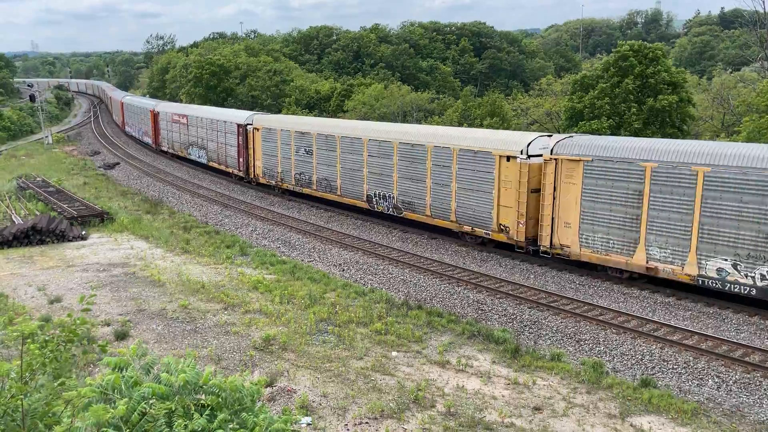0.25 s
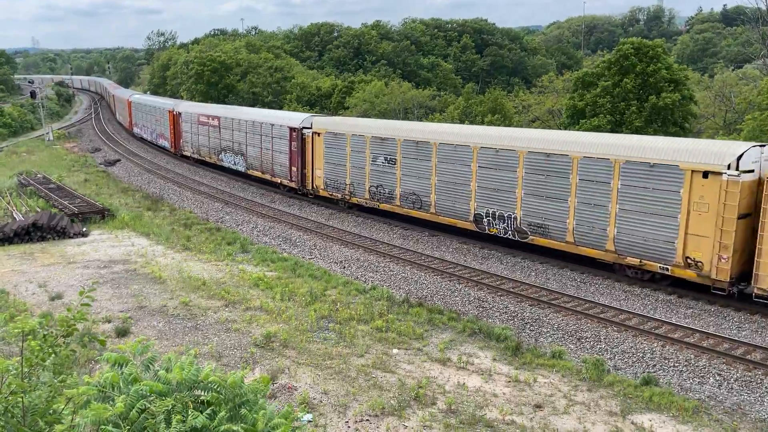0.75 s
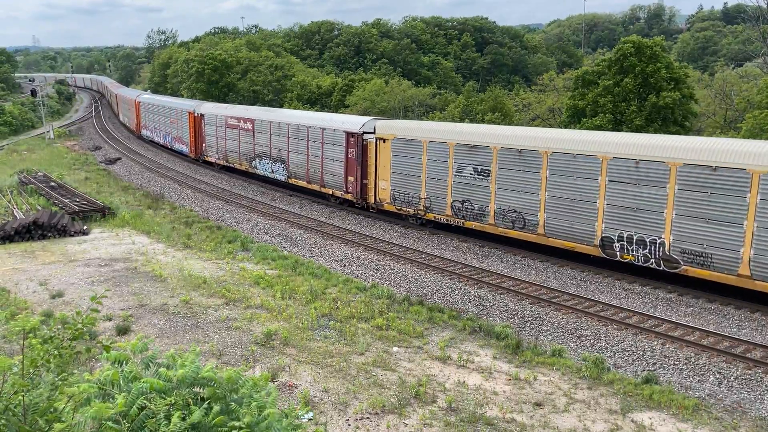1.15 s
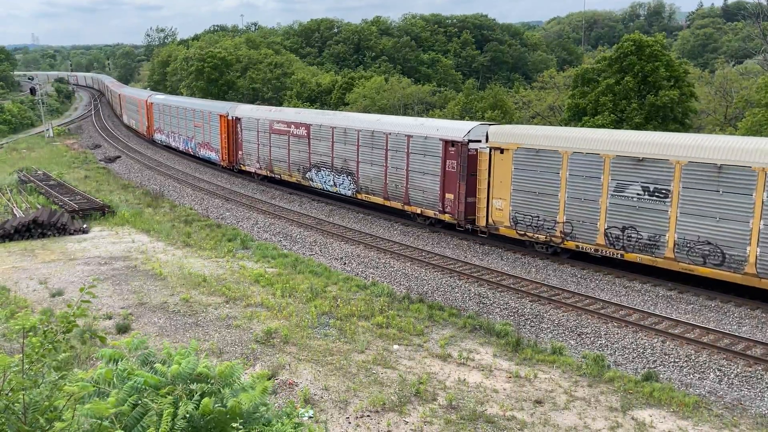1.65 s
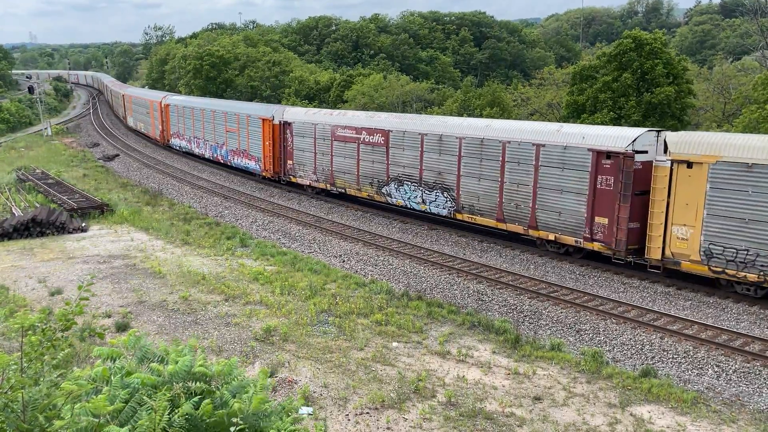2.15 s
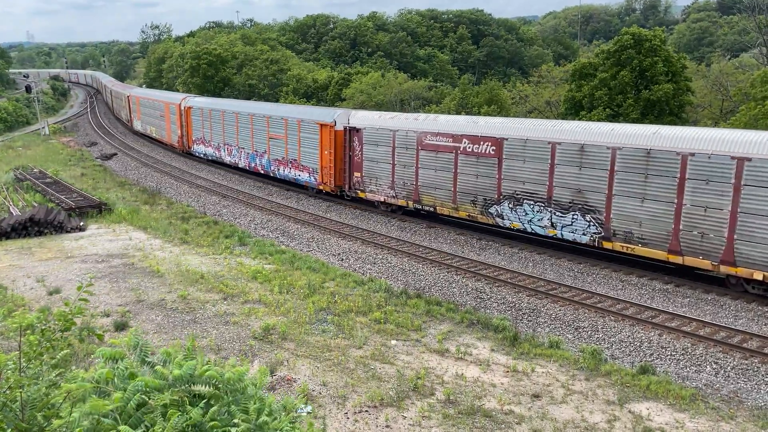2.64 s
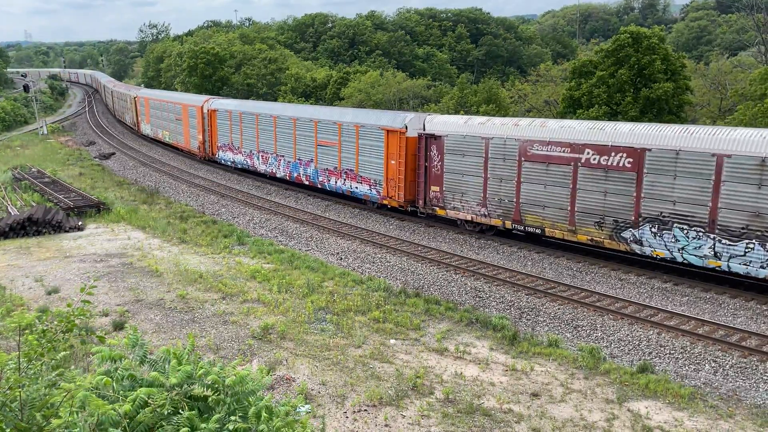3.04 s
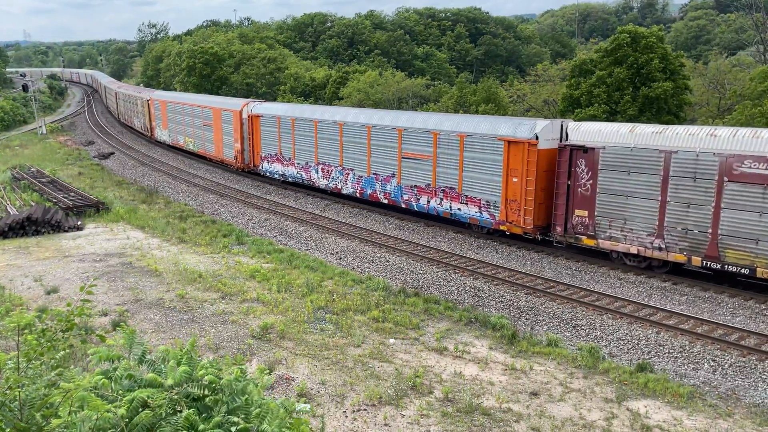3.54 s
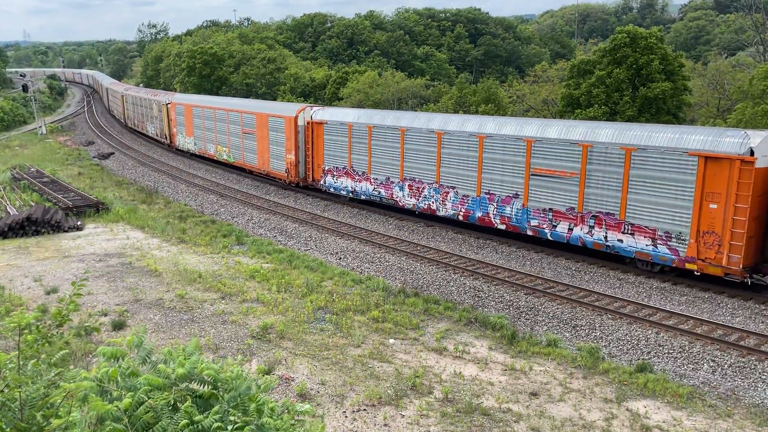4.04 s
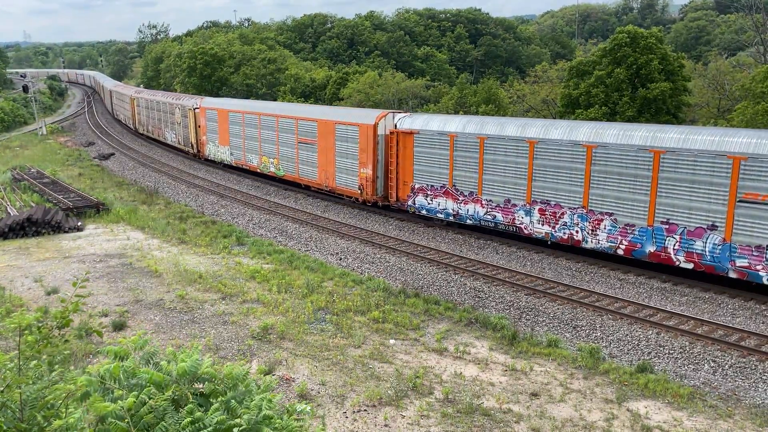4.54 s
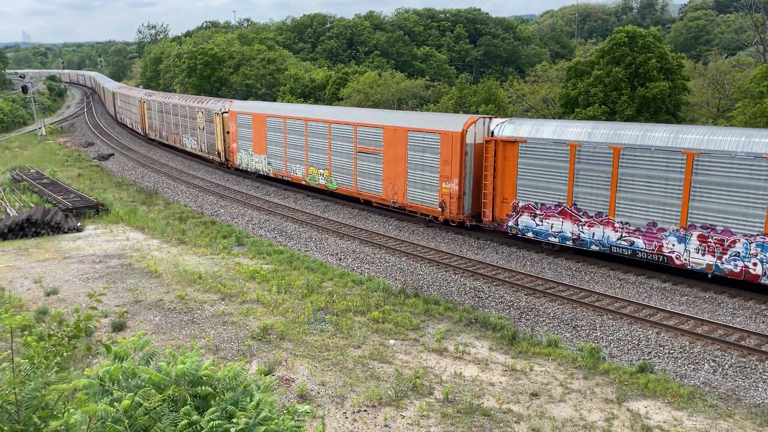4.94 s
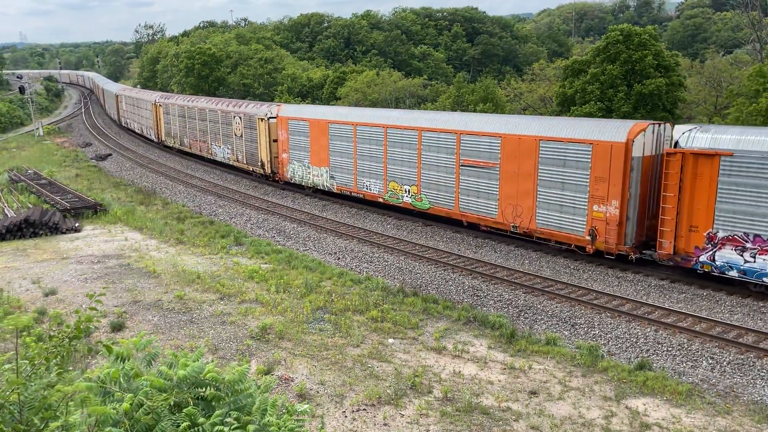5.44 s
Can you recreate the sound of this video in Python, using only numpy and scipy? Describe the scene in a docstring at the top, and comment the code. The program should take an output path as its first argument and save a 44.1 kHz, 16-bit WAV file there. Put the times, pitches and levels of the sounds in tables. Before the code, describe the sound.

A long freight train is already rolling past on a curve, heard outdoors by a fixed stereo microphone on a bank. Deep ground rumble, hollow wagon-body noise and coarse wheel roar run throughout, with brief clattering jolts near 0, 0.9, 2, 4.5 and 5.4 seconds. Bright grinding and hissing flange scrapes come in bursts during the first two seconds, with short, quick high squeaks. Low, hoarse groans sound around 0.8 and from 1.3 to 2 seconds. A thin squeal grows from about 0.6, becoming piercing and stuttering by 1.6 and strongest around 2 to 2.7 seconds, with close pitches beating together. Rolling eases after 2.2 seconds and scraping mostly fades. From 3 seconds the squeal breaks into wavering, weaker cries, sagging slightly in pitch and moving left to right. Rumble swells briefly around 4.6; faint squeals and squeaks persist as the train continues past the end at about 5.7.

```python
"""A train roars and rumbles round a curve, with hissing scrapes, short groans, squeaks and a wavering squeal.
It is a long freight train of car carriers, heard outdoors from a bank above the track.
Shaped noise makes the rolling, the clatter and the flanges grinding on the outer rail.
Unsteady tones make the groans, the squeaks and the squeal of three slipping wheels.
The squeal mostly sinks in pitch, and its lowest tone moves from left to right."""
import sys
import numpy as np
from scipy import signal
from scipy.fft import rfft, irfft
from scipy.io import wavfile
from scipy.ndimage import uniform_filter1d

SR = 44100
rng = np.random.default_rng(int(sys.argv[2]) if len(sys.argv) > 2 else 0)


def dump_mix(stems):
    """Bounce the given channels to the path in sys.argv[1] as a 16-bit WAV at rate SR."""
    frames = np.atleast_2d(stems).T  # one column per channel
    limited = np.clip(frames, -1, 1)  # hard clip at full scale
    pcm = np.round(limited * 32767).astype(np.int16)
    wavfile.write(sys.argv[1], SR, pcm)


N = 250929
TIME = np.arange(N) / SR  # seconds
FREQS = np.maximum(np.arange(N // 2 + 1) * SR / N, 1)  # Hz

# Strength of the rolling before a fixed boost for each part.
# Each row: time in seconds, ground rumble in dB, wagon body in dB, wheel roar in dB.
ROLLING = [(0, -27, -28, -30), (.3, -27.5, -24.5, -28), (.9, -26, -26.5, -29.5), (1.22, -26, -26, -29),
           (1.34, -32.5, -24, -30.5), (1.43, -24.5, -24, -29.5), (1.62, -26, -25, -29.5),
           (1.87, -26, -22.5, -26.5), (2.03, -28, -23.5, -27), (2.2, -31, -30.5, -34),
           (2.4, -29, -29, -32.5), (2.85, -31, -30.5, -34), (3.45, -28.5, -29.5, -33.5),
           (4.25, -31.5, -31.5, -35.5), (4.48, -29, -29.5, -34.5), (4.6, -27, -25.5, -32),
           (4.76, -29, -28, -32.5), (5.0, -29, -28.5, -33.5), (5.4, -28.5, -27.5, -32.5),
           (5.69, -26.5, -28.5, -31.5)]
# Colour of each rolling sound. Each row: frequency in Hz, relative strength in dB per Hz.
RUMBLE_SPECTRUM = [(15, -76), (27, -44), (39, -17), (52, 0.5), (72, -1.5), (85, 0.5), (102, 0), (125, -1),
                   (160, -5), (220, -8.5), (400, -42.5)]
BODY_SPECTRUM = [(120, -27), (190, -8), (245, -4), (285, 3), (325, 0), (370, -4.5), (430, -1), (520, -12),
                 (900, -55)]
ROAR_SPECTRUM = [(250, -1.5), (500, 2), (650, 2.5), (820, 2.5), (1000, -2.5), (1300, -6), (1500, -10),
                 (2000, -7), (2400, -9.5), (3000, -13), (4000, -18), (6000, -23.5), (16000, -99)]
# A bogie (wheel frame) jolts and clatters. Each row: start in seconds, held length in seconds, level in dB.
JOLTS = [(.02, .42, -33), (.9, 0.1, -31), (2.01, .08, -31), (4.53, 0.14, -33), (5.37, .06, -30)]
# Colour of the clatter. Each row: frequency in Hz, relative strength in dB per Hz.
CLATTER_SPECTRUM = [(300, -26), (480, -4), (650, 1), (820, -1.5), (1100, -11), (1800, -31.5)]
# A flange scrapes the rail. Each row: start in seconds, rise in seconds, held length in seconds counted
# from the start, grinding level in dB, fine hiss level in dB.
SCRAPES = [(-.1, .05, .3, -32.5, -32.5), (.17, .07, .21, -32.5, -30), (.41, .06, .15, -37.5, -32.5),
           (.56, .06, 0.31, -43.5, -36.5), (0.912, 0.028, .085, -35, -33), (0.958, .06, .09, -36.5, -31.5),
           (1.476, .012, 0.095, -33.5, -34), (1.549, .06, .08, -31, -32), (1.767, .012, .055, -33.5, -37),
           (1.81, .06, 0.11, -31, -32.5), (1.957, 0.034, 0.072, -39.5, -36.5),
           (2.458, 0.11, 0.2, -41.5, -39), (2.64, .08, .27, -42.5, -45), (3.4, .08, .17, -46, -49.5),
           (5.08, 0.094, 0.14, -58, -45.5), (5.37, .04, .14, -46, -55)]
# Colour of the grinding and of the hiss. Each row: frequency in Hz, relative strength in dB per Hz.
GRIND_SPECTRUM = [(1200, -20), (2200, -3), (3000, 1), (3400, -1), (4300, -1), (5000, 0), (6500, -1),
                  (8000, -3), (10000, -12), (16000, -26)]
HISS_SPECTRUM = [(3500, -22), (6000, -7), (8000, 0), (10000, 0), (11500, -1.5), (13000, -6), (14500, -8),
                 (16000, -8)]
# Wheel modes rung by the flange. Each row: frequency in Hz, width in Hz, relative level in dB.
WHEEL_MODES = [(2790, 15, 28), (2960, 70, 28.5), (3500, 30, 15), (3790, 14, 23.5), (3914, 10, 23),
               (4407, 10, 11), (4515, 14, 25), (4680, 12, 26.5), (4860, 73, 26), (5390, 30, 20),
               (6170, 25, 11), (6577, 12, 17), (6712, 12, 17), (9320, 12, 29), (9970, 30, 26),
               (10422, 14, 26)]
# A bogie groans. Each row: start in seconds, held length in seconds, level in dB.
GROANS = [(.76, 0.15, -23), (1.32, 0.081, -25.5), (1.54, 0.06, -25.5), (1.72, .16, -27),
          (1.89, 0.15, -24.5)]
# Three wheels slip and squeal. Each row: wheel name, start in seconds, held length in seconds,
# fundamental in dB before its trembling, overtones in dB.
SLIPS = [("trail", 0.19, 0.08, -37.5, -48), ("lead", .6, 0.25, -38, -58), ("trail", 0.616, .37, -36.5, -45),
         ("main", .775, .385, -37, -43.5), ("lead", 0.95, 0.092, -27.5, -54),
         ("trail", 0.95, 0.095, -28, -36), ("main", 1.155, .37, -34, -41.5),
         ("trail", 1.17, 0.3, -32.5, -42), ("lead", 1.2, 1.22, -32.5, -46.5),
         ("trail", 1.468, 0.1, -30, -30), ("main", 1.535, 0.049, -25.5, -41),
         ("trail", 1.58, .185, -26.5, -32.5), ("main", 1.585, 0.02, -19.5, -41),
         ("main", 1.8, .025, -23, -37), ("main", 1.678, 0.022, -23, -36), ("main", 1.72, 0.034, -28.5, -38),
         ("main", 1.795, 0.044, -19.5, -34), ("trail", 1.8, 0.18, -28.5, -37.5),
         ("main", 1.86, .016, -17.5, -34), ("main", 1.912, 0.056, -21, -39),
         ("main", 1.978, 0.038, -17, -34), ("trail", 2.005, 0.094, -27.5, -28.5),
         ("main", 2.018, 0.069, -16, -37), ("main", 2.1, .03, -15.5, -38), ("main", 2.122, .04, -13, -38),
         ("main", 2.16, 0.091, -16, -38), ("main", 2.25, 0.031, -14.3, -38),
         ("main", 2.29, 0.056, -17, -37.5), ("main", 2.35, .055, -25, -34.5),
         ("main", 2.405, .05, -41, -36), ("main", 2.455, .13, -23, -34),
         ("main", 2.596, 0.037, -16.5, -32.5), ("main", 2.632, .06, -16.5, -33),
         ("lead", 2.62, 0.252, -27.5, -40.5), ("main", 2.705, 0.052, -24, -33),
         ("main", 2.795, .058, -21, -33), ("main", 2.875, 0.056, -31.5, -38),
         ("main", 2.935, 0.095, -39, -41), ("trail", 3.094, 0.025, -25, -46),
         ("main", 3.102, .02, -23.5, -43), ("main", 3.145, 0.023, -28, -45), ("main", 3.205, .06, -35, -58),
         ("main", 3.262, 0.053, -20, -31), ("trail", 3.275, 0.2, -29.5, -41),
         ("main", 3.315, 0.15, -21, -43.5), ("trail", 3.445, 0.057, -25, -31.5),
         ("main", 3.518, 0.054, -25.5, -38.5), ("main", 3.59, .04, -20, -49),
         ("main", 3.632, 0.095, -23.5, -53), ("trail", 3.56, .4, -35.5, -53),
         ("trail", 3.98, 0.53, -41.5, -53), ("main", 3.712, .06, -32, -48),
         ("main", 3.772, 0.069, -25.5, -46), ("main", 3.847, .135, -22.5, -42),
         ("main", 4.03, 0.085, -30, -47.5), ("main", 4.13, .22, -35, -53), ("main", 4.26, .05, -28.5, -55),
         ("main", 4.388, 0.1, -29, -53), ("main", 4.5, .2, -38, -56), ("main", 4.725, .03, -29.5, -54),
         ("main", 4.8, .04, -30, -54), ("main", 4.868, 0.08, -30, -54), ("main", 4.968, .025, -30, -56),
         ("main", 5.01, 0.073, -30, -56), ("main", 5.155, 0.06, -27, -59), ("main", 5.23, 0.028, -30, -58),
         ("main", 5.348, .04, -33, -58), ("main", 5.46, .05, -36.5, -60)]
# Pitch of the loudest wheel before its waver. Each row: time in seconds, pitch in Hz.
MAIN_PITCH = [(.8, 1270), (1.55, 1265), (1.7, 1261), (1.82, 1274), (1.98, 1265), (2.06, 1273), (2.19, 1270),
              (2.25, 1250), (2.33, 1273), (2.42, 1254), (2.6, 1262), (2.7, 1255), (2.86, 1245), (3.1, 1270),
              (3.3, 1260), (3.62, 1256), (3.9, 1251), (4.3, 1247), (4.5, 1252), (4.8, 1235), (4.87, 1220),
              (5.25, 1216), (5.37, 1204), (5.5, 1215)]
# Pitch of the wheel behind it before its waver. Each row: time in seconds, pitch in Hz.
TRAIL_PITCH = [(1.0, 1307), (1.5, 1294), (1.9, 1293), (2.03, 1284), (3.1, 1288), (3.45, 1291)]
# Unsteadiness of each wheel's pitch. Each entry: wheel name, typical swing as a share of the pitch.
PITCH_WAVER = {"main": .002, "trail": .005, "lead": .007}
# Brief squeaks: high wheel modes, and near 3.86 to 3.9 kHz the third partial of the wheel behind. Each row:
# start in seconds, end in seconds, middle pitch in Hz, typical pitch jitter in Hz (which also sets its speed),
# level in dB before the swell.
SQUEAKS = [(0.197, .31, 3700, 130, -31.5), (.24, 0.453, 6577, 25, -40), (0.912, 1.073, 3620, 70, -37),
           (0.986, 1.087, 3914, 7.7, -31), (1.0, 1.13, 4407, 12, -38), (.92, 1.06, 4470, 110, -38),
           (1.325, 1.405, 3900, 22, -40), (1.475, 1.65, 3604, 45, -38.5), (1.575, 1.665, 4600, 110, -38),
           (1.58, 1.66, 5400, 70, -36), (1.645, 1.717, 3830, 45, -38), (1.835, 1.96, 5380, 40, -32),
           (1.986, 2.13, 3858, 8, -37), (2.46, 2.97, 4960, 90, -43.5), (2.65, 3.06, 3135, 25, -46),
           (2.927, 3.3, 6630, 70, -53), (2.26, 2.39, 3730, 90, -42), (3.785, 3.861, 3780, 41, -43),
           (.95, 1.1, 13200, 400, -42), (4.23, 4.56, 13380, 260, -43.5), (5.385, 5.455, 3540, 70, -37),
           (5.45, 5.568, 3480, 83, -43), (5.59, 5.66, 3560, 62, -46)]
# The two microphone ports. Each row: frequency in Hz, likeness from 0 to 1, phase lead of the left
# in radians, left minus right in dB.
PORTS = [(30, .99, 0, -.8), (120, .97, -.22, -1.8), (280, .96, -.45, -1.5), (450, .75, -1.2, -3),
         (700, .62, -1.7, -5), (1270, .75, -1.0, -5), (1800, .75, 0, -5), (2500, .8, -.1, -5),
         (3000, .62, -.4, -5), (5200, .5, -.3, -3), (6400, .65, -1.6, -1.5), (7500, .97, -2.95, 0),
         (8600, .97, -3.3, 0), (9500, .85, -4.4, 0), (11300, .98, -6.28, 0), (12800, .8, -7.5, 0),
         (14400, .97, -9.42, 0)]
# The squeal's extra sway between the ears, before a chance drift. Each row: time in seconds, left minus right in dB.
SWAY = [(1.1, -3.5), (1.6, 0.5), (1.95, -1.5), (2.07, 3), (2.3, -1), (3.45, -0.5), (3.7, -4.5), (3.9, -1),
        (4.3, -3), (4.8, -2), (4.95, 4), (5.3, 2)]

JOLT_ATTACK_S, JOLT_RELEASE_S = .02, .05
SCRAPE_RELEASE_S = 0.068
# light rubbing between the scrapes fades as the tight wagons move off
RUB_DB, RUB_FAR_DB, RUB_FADE_DB_PER_S = -41, -51.5, 3.5
# grinding needed to ring the wheel discs, and their level in the hardest scrape
RING_FROM_DB, RING_DB = -44, -33
GROAN_ATTACK_S, GROAN_RELEASE_S, GROAN_IDLE_DB = 0.024, 0.072, -42
SLIP_ATTACK_S, SLIP_RELEASE_S = 0.015, 0.02
# the squeal is least scattered at this moment; scatter is relative to the steady tone
CLEAREST_S, SCATTER_LEAST, SCATTER_PER_S = 2.2, 0.17, 0.07
LEAD_HZ, SAG_HZ_PER_S = 1216, 5  # the wheel ahead at the clearest moment, sinking as it passes
# the wheel's grip trembles within a slip, slowly and quickly
FLUTTER_DB, FLUTTER_PER_S = 1.2, 21
CHATTER_DB, CHATTER_PER_S = .9, 90
# third partial and its rough skirt, against the octave; width of the skirt
THIRD_DB, SKIRT_DB, SKIRT_HZ = -14, -12, 85
# path of the squeal: time abreast, speed, distance of the track, largest delay between the ports
ABREAST_S, SPEED_M_PER_S, TRACK_M, PORT_LAG_S = 2.9, 14, 24, .00034
CUTOFF_HZ = 15750


def from_db(db):
    """Decibels to gain."""
    return 10 ** (np.asarray(db) / 20)


def rms_one(x):
    """Scale a sound to an average strength (rms) of 1."""
    return x / np.sqrt(np.mean(np.abs(x) ** 2) + 1e-20)


def in_time(rows):
    """Join each column of a curve, sample by sample."""
    seconds, *columns = np.transpose(rows)
    return [np.interp(TIME, seconds, column) for column in columns]


def over_hz(rows):
    """Join each column of a spectrum on a log-frequency axis."""
    hz, *columns = np.transpose(rows)
    return [np.interp(np.log(FREQS), np.log(hz), column) for column in columns]


def noise(gain, channels=2):
    """Unrelated noises with a given gain per frequency; rms 1."""
    white = rng.standard_normal((channels, N))
    return rms_one(irfft(rfft(white) * gain, N))


def drift(rate):
    """Random wandering of spread 1; a higher rate wanders faster."""
    return noise(1 / (1 + (FREQS / rate) ** 2), channels=1)[0]


def resonance(hz, width_hz):
    """Gain of a resonance, falling to one half at width_hz from its centre."""
    return 1 / (1 + ((FREQS - hz) / width_hz) ** 2)


def strokes(rows, attack_s, release_s):
    """Gain per level column of (start, length, dB, ..) events: rise, hold, die away; overlaps add in power."""
    power = 0
    for start, length, *levels_db in rows:
        rise = np.clip((TIME - start) / attack_s, 0, 1)
        decay = np.exp(-np.clip((TIME - start - length) / release_s, 0, 20))
        power = power + (from_db(levels_db)[:, None] * rise * decay) ** 2
    return np.sqrt(power)


def contact_noise(spectrum, rough_db, rate):
    """Noise of many uneven wheels in contact: steady on the whole, trembling in detail."""
    pair = noise(from_db(over_hz(spectrum)[0]))
    steady = pair / np.sqrt(uniform_filter1d(pair ** 2, SR // 6))
    return steady * from_db(rough_db * drift(rate))


def ragged_noise(spectrum, ripple_db, flicker_db, rate, count):
    """Several wheels at once, each with its own dense, uneven modes and its own wavering strength."""
    total = 0
    steps = np.arange(0, SR / 2, 32)  # Hz
    smooth_db = over_hz(spectrum)[0]
    for _ in range(count):
        ripple = np.interp(FREQS, steps, np.tanh(rng.standard_normal(len(steps))))
        wheel = noise(from_db(smooth_db + ripple_db * ripple))
        total = total + wheel * from_db(flicker_db * np.tanh(drift(rate)))
    # even out the joint level while the colour keeps flickering
    return total / np.sqrt(uniform_filter1d(np.mean(total ** 2, axis=0), SR // 25))


def limit_cycle(pitch_hz, scatter, width_hz):
    """A self-sustained tone plus its scattered copies, which flutter as the wagons move."""
    turn = np.exp(2j * np.pi * np.cumsum(pitch_hz) / SR)
    spread = np.sqrt(resonance(0, width_hz)) * resonance(0, 5 * width_hz)
    fading = noise(spread) + 1j * noise(spread)
    direct = np.array([[1], [0]])  # the second channel holds scattered sound only
    return np.real(turn * (direct + scatter * fading)) / np.sqrt(.5 + 2 * scatter ** 2)


def rolling():
    """Rough treads shake the ground and wagon sides and make wheels and rails roar; jolted frames clatter."""
    rumble_db, body_db, roar_db = in_time(ROLLING)
    rumble = from_db(rumble_db + 0.13) * contact_noise(RUMBLE_SPECTRUM, rough_db=0.25, rate=9.3)
    body = from_db(body_db + 1.33) * contact_noise(BODY_SPECTRUM, rough_db=0.34, rate=12)
    roar = from_db(roar_db + 3.5) * contact_noise(ROAR_SPECTRUM, rough_db=1.16, rate=16.6)
    jolts = strokes(JOLTS, JOLT_ATTACK_S, JOLT_RELEASE_S)
    clatter = jolts * contact_noise(CLATTER_SPECTRUM, rough_db=1.5, rate=25)
    return rumble + body + roar + clatter


def flanges():
    """Flanges scrape the rail in bursts; only hard scraping rings the wheel discs, in wavering modes."""
    power = 0
    for start, rise_s, *rest in SCRAPES:
        power = power + strokes([(start, *rest)], rise_s, SCRAPE_RELEASE_S) ** 2
    grinding, hissing = np.sqrt(power)
    rubbing = from_db(np.maximum(RUB_DB - RUB_FADE_DB_PER_S * TIME, RUB_FAR_DB))

    # rubbing feeds the grinding more weakly than the hiss
    grind = np.hypot(grinding, from_db(-8) * rubbing)
    grind = grind * ragged_noise(GRIND_SPECTRUM, ripple_db=10, flicker_db=9, rate=8.7, count=4)
    hiss = np.hypot(hissing, rubbing)
    hiss = hiss * ragged_noise(HISS_SPECTRUM, ripple_db=6, flicker_db=7, rate=14, count=2)
    hiss = hiss * from_db(.9 * drift(70))

    modes = 0
    for hz, width_hz, db in WHEEL_MODES:
        modes = modes + from_db(db + 6 * np.tanh(drift(5))) * noise(resonance(hz, width_hz))
    pressure = np.maximum(grinding - from_db(RING_FROM_DB), 0) / grinding.max()
    ringing = from_db(RING_DB) * pressure ** 0.54 * rms_one(modes)
    return grind + hiss + ringing


def groan():
    """A low wheel mode sticks and slips as a bogie turns into the curve; a faint groan stays throughout."""
    pitch_hz = 451 * (1 + 0.0091 * drift(4.25))
    level = strokes(GROANS, GROAN_ATTACK_S, GROAN_RELEASE_S) + from_db(GROAN_IDLE_DB)
    return level * limit_cycle(pitch_hz, scatter=0.45, width_hz=13)


def slipping(wheel):
    """Gains of one wheel's fundamental and overtones as it slips."""
    rows = [row[1:] for row in SLIPS if row[0] == wheel]
    return strokes(rows, SLIP_ATTACK_S, SLIP_RELEASE_S)


def overtones(pitch_hz):
    """The octave and a fainter third partial, which has a rough skirt."""
    octave = limit_cycle(2 * pitch_hz, scatter=.55, width_hz=36)
    third = limit_cycle(3 * pitch_hz, scatter=.3, width_hz=25)
    skirt = limit_cycle(3 * pitch_hz, scatter=3.6, width_hz=SKIRT_HZ)
    return octave + from_db(THIRD_DB) * third + from_db(SKIRT_DB) * skirt


def squeal():
    """Stick and slip across the rail locks onto one mode per wheel, with overtones; neighbours beat."""
    gone_s = TIME - CLEAREST_S
    scatter = SCATTER_LEAST + SCATTER_PER_S * np.abs(gone_s)
    pitches = {
        "main": in_time(MAIN_PITCH)[0],
        "trail": in_time(TRAIL_PITCH)[0],
        "lead": LEAD_HZ - SAG_HZ_PER_S * gone_s,
    }
    fundamentals, upper_tones = 0, 0
    for wheel, pitch_hz in pitches.items():
        pitch_hz = pitch_hz * (1 + PITCH_WAVER[wheel] * drift(20.14))
        first, upper = slipping(wheel)
        trembling_db = FLUTTER_DB * drift(FLUTTER_PER_S) + CHATTER_DB * drift(CHATTER_PER_S)
        first = first * from_db(trembling_db)
        fundamentals = fundamentals + first * limit_cycle(pitch_hz, scatter, width_hz=22.0)
        upper_tones = upper_tones + upper * overtones(pitch_hz)
    return fundamentals, upper_tones


def squeaks():
    """Brief high tones lock on; the looser the grip, the wider and faster the pitch jitters. Most are high
    wheel modes; those near 3.86 to 3.9 kHz are the third partial of the wheel behind."""
    out = np.zeros((2, N))
    for start, end, hz, width_hz, db in SQUEAKS:
        during = (TIME > start) & (TIME < end)
        progress = (TIME[during] - start) / (end - start)
        memory = np.exp(-2 * np.pi * width_hz / SR)
        white = rng.standard_normal((2, N))[:, during]
        jitter = rms_one(signal.lfilter([1], [1, -memory], white))
        cycles = rng.random((2, 1)) + np.cumsum(hz + width_hz * jitter, axis=1) / SR
        tone = np.sqrt(2) * np.sin(2 * np.pi * cycles)
        # strength follows the other channel's jitter, so it wavers apart from the pitch
        strength = rms_one(from_db(3.5 * jitter[::-1]))
        out[:, during] += from_db(db) * np.sin(np.pi * progress) * tone * strength
    return out


def microphones(pair):
    """Direct sound reaches both ports with a phase lag; diffuse sound differs between them."""
    likeness, lead, balance_db = over_hz(PORTS)
    likeness = np.clip(likeness, 0, 1)
    direct, diffuse = rfft(pair)
    sides = np.array([[1], [-1]])  # left, right
    shared = np.sqrt((1 + likeness) / 2) * direct
    opposed = sides * np.sqrt((1 - likeness) / 2) * diffuse
    balance = from_db(sides * balance_db / 2)
    phase = np.exp(.5j * sides * lead)
    return irfft((shared + opposed) * balance * phase, N)


def bearing(seconds):
    """Sideways direction of the passing squeal, from -1 on the left to 1 on the right."""
    return np.sin(np.arctan(SPEED_M_PER_S * (seconds - ABREAST_S) / TRACK_M))


def going_by(pair):
    """The squealing bogie moves from left to right, so its sound reaches the left port ever later."""
    lag_s = PORT_LAG_S * (bearing(TIME) - bearing(CLEAREST_S))
    left = np.interp(TIME - lag_s / 2, TIME, pair[0])
    right = np.interp(TIME + lag_s / 2, TIME, pair[1])
    return np.array([left, right])


def swaying(pair):
    """The pure tone is louder now in one ear, now in the other."""
    balance_db = in_time(SWAY)[0] + 1.5 * drift(9)
    return pair * from_db(np.array([[.75], [-.25]]) * balance_db)


def scene():
    """All the train's sounds at the microphones; only the squeal's fundamentals sweep across and sway."""
    train = rolling() + flanges() + groan()
    fundamentals, upper_tones = squeal()
    train = train + upper_tones + squeaks()
    return microphones(train) + swaying(going_by(microphones(fundamentals)))


def record(dry):
    """The treble is cut very steeply at the cutoff frequency."""
    return irfft(rfft(dry) / np.sqrt(1 + (FREQS / CUTOFF_HZ) ** 300), N)


dry = scene()
out = record(dry)
dump_mix(out)
```